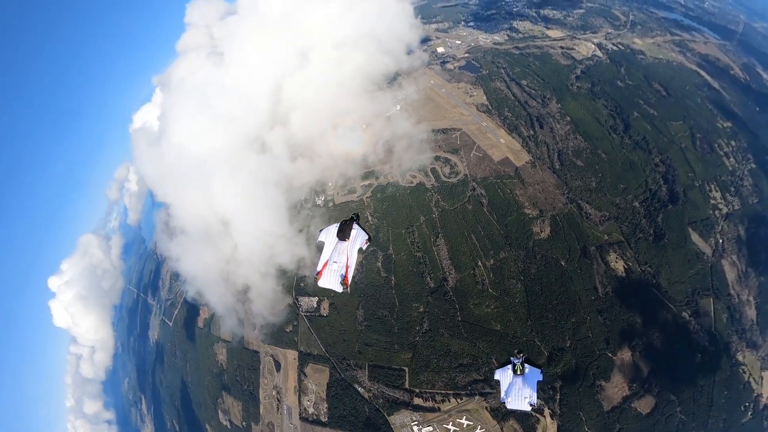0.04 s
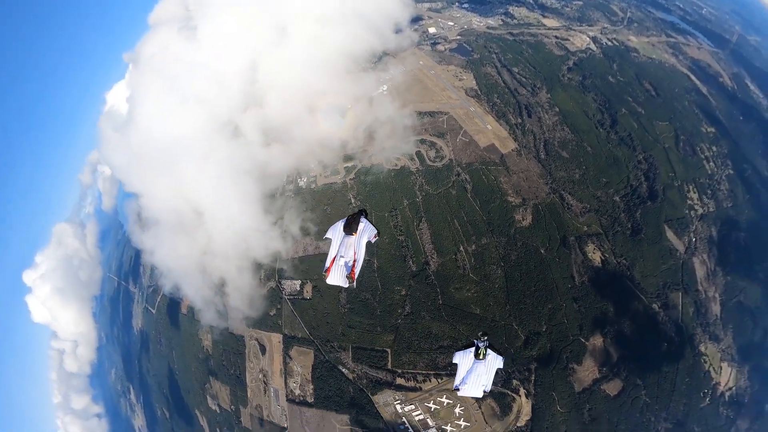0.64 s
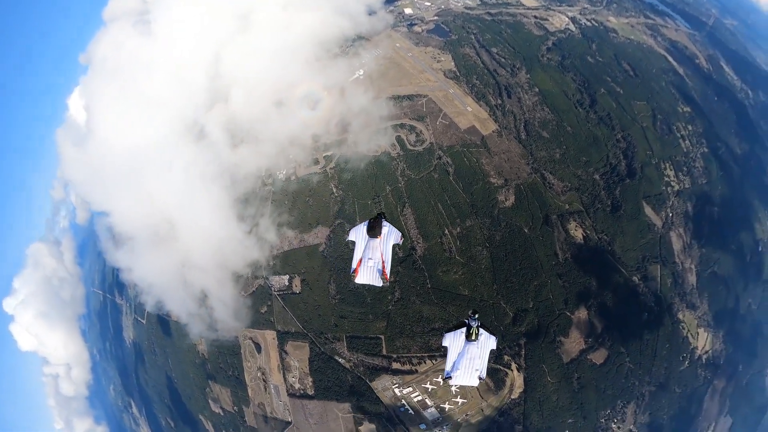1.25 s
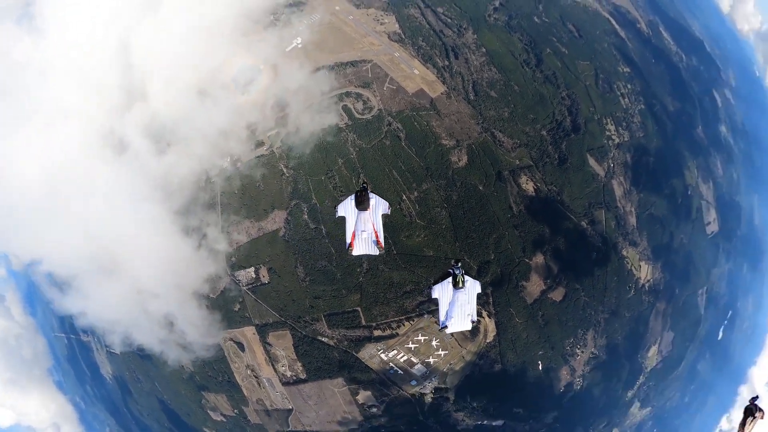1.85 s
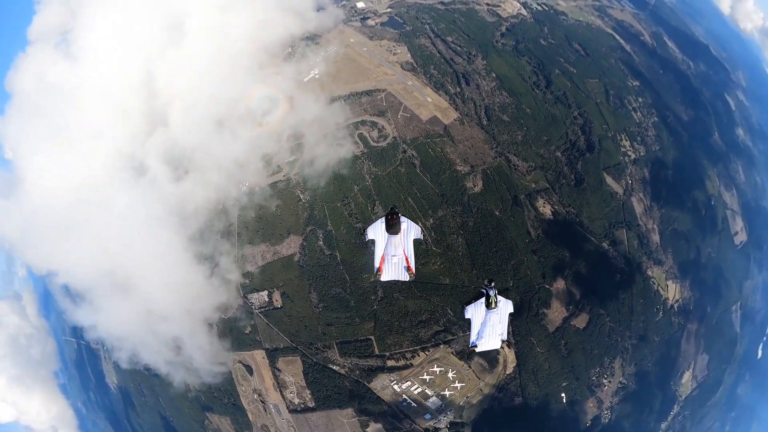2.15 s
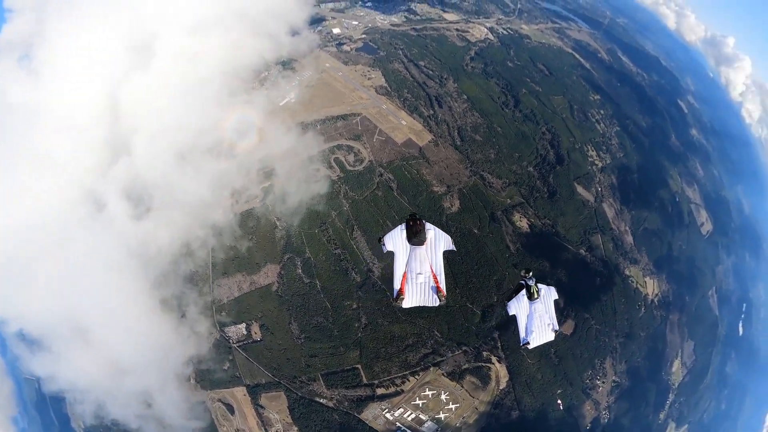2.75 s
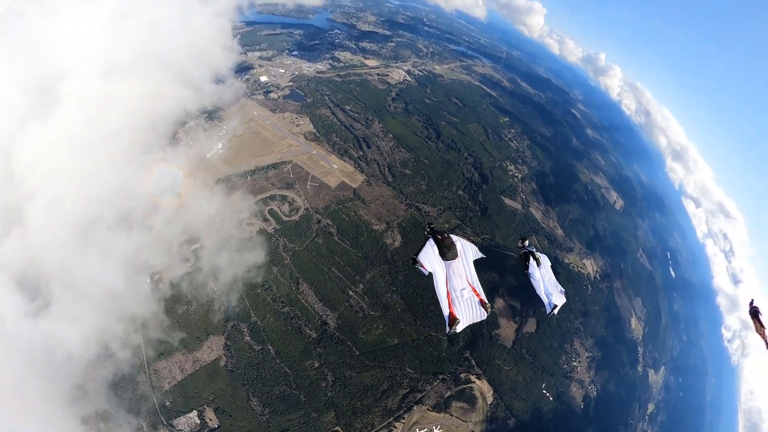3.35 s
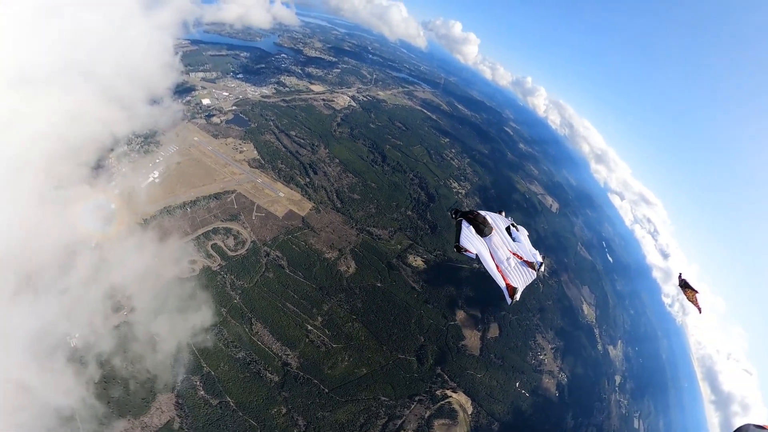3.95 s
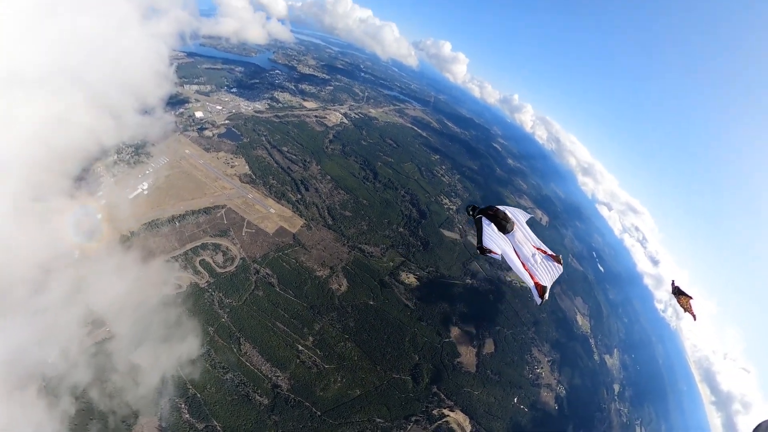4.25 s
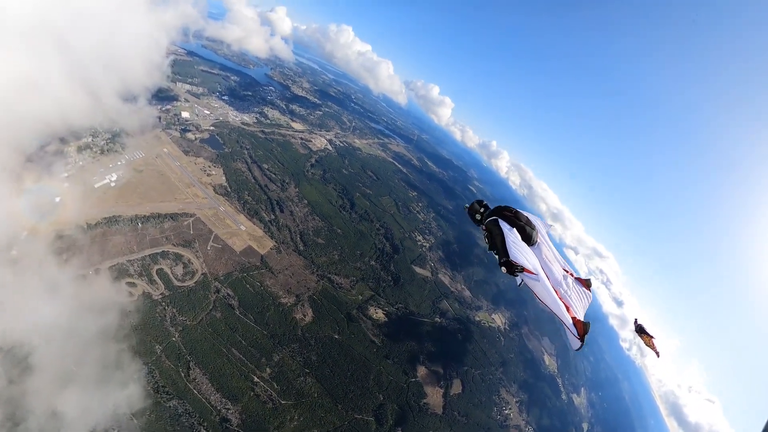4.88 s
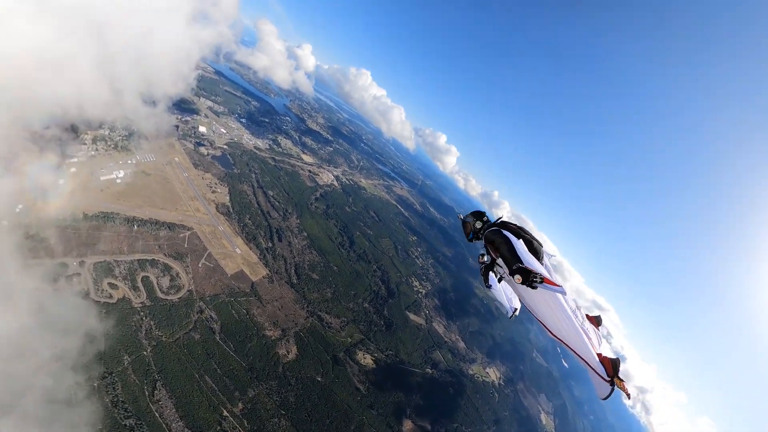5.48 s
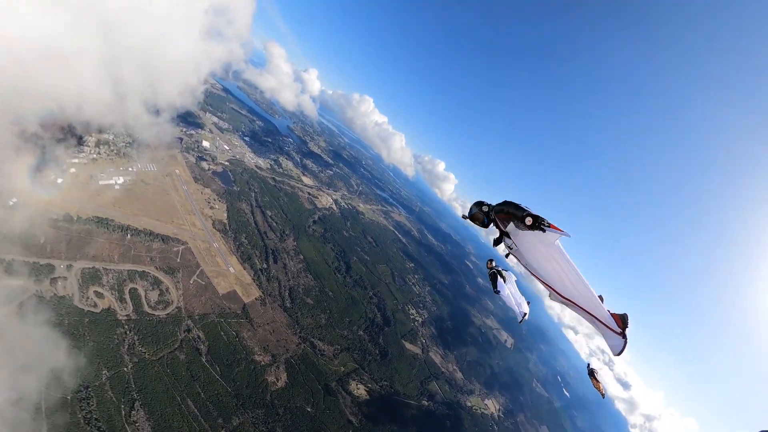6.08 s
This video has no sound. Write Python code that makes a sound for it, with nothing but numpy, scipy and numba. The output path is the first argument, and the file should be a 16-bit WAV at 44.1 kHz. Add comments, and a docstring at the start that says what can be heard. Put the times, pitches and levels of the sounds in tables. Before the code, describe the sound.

Wind rushes past a helmet microphone in wingsuit flight for about six seconds, a broad hiss over a low, fluttering roar. For the first 1.6 seconds it is fairly even, with thin, faint whistles and a very high ringing hiss. A strap buzzes faintly from about 1 to 2.4 seconds, and a deep drone swells underneath. A low gust thumps the microphone at 1.7 seconds, then the rush dips just after 2 seconds. From about 2.9 seconds the wind builds into heavier buffeting with a slight hollow howl, strongest from 3.5 to 5.4 seconds, while the high ringing fades in and out. Dull thuds land near 4.5 and 5.3 seconds. Short, ragged spurts of hiss tear through between 4.4 and 5.5 seconds. The air eases slightly, then surges again around 6 seconds.

```python
"""A rush of air over a low roar, with a thin whistle: wingsuit flight heard from a helmet camera.
Turbulence excites the resonances of the helmet's hollows and gaps, and a taut strap edge buzzes.
As the head turns, eddies strike the microphone in low surges and the flow tears into a ragged hiss.
The tiny microphone port rings high up while the flow grazes it smoothly."""
import sys
import numpy as np
from scipy import signal
from scipy.fft import rfft, irfft, next_fast_len
from scipy.io import wavfile
from scipy.ndimage import uniform_filter1d, minimum_filter1d
from numba import njit

SR = 44100
rng = np.random.default_rng(int(sys.argv[2]) if len(sys.argv) > 2 else 0)


def persist_wave(psi):
    """Save psi, clipped to +-1, as 16-bit WAV."""
    counts = np.round(np.clip(psi, -1, 1) * 32767).astype(np.int16)
    wavfile.write(sys.argv[1], SR, np.atleast_2d(counts).T)


N = 274302

# airflow strength against cruising: time_s, level_db
AIRFLOW_CURVE = [(0, .5), (.18, -1.5), (.45, 0.1), (.98, 0.6), (1.3, -2.5), (1.62, -1.5), (2.1, -6.5),
                 (2.8, -0.5), (3.68, 1.4), (3.81, 3.8), (3.91, 0), (4.55, 2), (4.92, -1.1), (5.35, 0),
                 (5.55, -4), (5.85, -2.5), (6.22, .5)]
# smoothness of the flow across the port: time_s, level_db
GRAZING_CURVE = [(0, 1), (1.62, 1), (1.9, -10), (2.1, -6), (2.55, -6), (2.95, -1), (3.47, -1), (3.97, -11),
                 (4.25, -6), (4.78, -23), (5.27, -1), (5.72, -16), (6.15, -5)]
# upper edge of the churning, higher for smaller whirls: time_s, cutoff_hz
CHURN_CUTOFF = [(0, 815), (1.5, 510), (2.7, 624), (3.6, 606), (3.8, 805), (5.2, 945), (5.7, 563),
                (6.22, 605)]

# spectra of turbulent pressure: frequency_hz, relative_db
EDDY_SPECTRUM = [(30, 4), (70, -18), (100, -2), (135, -0.5), (200, -2), (300, -5), (500, -8.5), (2000, -13)]
CHURN_SPECTRUM = [(120, -29), (260, 3.5), (400, 0.5), (560, -4), (800, -3.5), (1200, -8.5), (2000, -5.5),
                  (5000, -30)]
RUSH_SPECTRUM = [(300, 1), (700, -5), (1100, 4.5), (1450, 0), (1850, -1.5), (2300, -4), (2800, -5.5),
                 (3600, -8.5), (4800, -15), (6500, -24.5), (9000, -39), (16000, -60)]
HISS_SPECTRUM = [(2000, -14), (3500, -1), (5000, 0), (6500, -4), (8000, -10), (9000, -13), (10200, -10),
                 (11500, -9), (12300, -14), (13200, -27), (16000, -55)]
THUD_SPECTRUM = [(10, -12), (22, -5), (35, -3), (52, 0), (68, -1), (90, -8), (130, -20), (220, -45)]
RIP_SPECTRUM = [(600, -2), (1500, 5), (2800, 4), (4400, 1), (6000, -4), (7500, -10), (9000, -16),
                (10200, -12), (11600, -10), (12500, -18), (13500, -29), (16000, -60)]
# spectra of the port's ring and its parts: frequency_hz, relative_db
RING_SPECTRUM = [(9000, -32), (10800, -17), (11350, -12), (11700, -3), (12000, 0), (12400, -4),
                 (12800, -12), (13500, -30), (16000, -60)]
SIZZLE_SPECTRUM = [(10000, -40), (11500, -14), (12400, 0), (12800, 0), (13300, -3), (14200, -8),
                   (15600, -14)]
CORE_SPECTRUM = [(10500, -45), (11400, -22), (11750, -3), (12350, 0), (12800, -7), (13400, -25),
                 (16000, -60)]
SIDE_ON_SPECTRUM = [(8500, -22), (10000, -6), (11300, 0), (12300, -4), (13200, -22), (16000, -60)]
# resonances of the helmet's hollows: pitch_hz, width_hz, relative_db
HOLLOW_MODES = [(928, 100, -9.5), (1870, 260, -10.5), (2690, 620, -12)]
# overtones of the strap: harmonic_number, relative_db
STRAP_HARMONICS = [(2, -1), (3, -7), (4, 0), (5, -11), (6, -4.5), (7, -11), (8, -9)]

# whistling gaps: start_s, length_s, level_db, pitch_hz, glide_hz_per_s
GAP_WHISTLES = [(0, 1.0, -47, 935, -2), (.5, .45, -51.5, 2980, -450), (.88, 0.79, -52.5, 1865, -40),
                (.8, 0.49, -64, 6250, -480), (3, 0.27, -69, 6200, 650)]
# passing events in the flow: start_s, length_s, level_db
EDDY_THUMPS = [(.2, 0.12, -25), (.9, 0.6, -25), (1.73, 0.28, -20.5), (3.62, 0.13, -27), (4.52, 0.14, -19.5),
               (4.8, .38, -29), (5.28, 0.21, -17.5), (6.02, 0.15, -26)]
STRAP_BUZZES = [(.94, 0.7, -50.5), (1.85, .55, -57)]
WAKE_DRONES = [(.95, 0.34, -23.5), (1.5, 0.59, -24), (3.1, 0.32, -25), (3.8, 0.42, -23.5),
               (4.56, 0.1, -19.5), (5.15, .15, -20.5), (5.95, 0.22, -24)]
EDDY_SURGES = [(1.71, 0.29, -20), (2.88, 0.61, -20.3), (3.52, 1.0, -16.5), (4.66, 0.75, -17),
               (4.95, 0.17, -20.5), (5.48, 0.27, -21), (5.89, 0.29, -18.5)]
WHIRL_PACKS = [(3.2, 0.55, -27), (4.28, 0.31, -29), (5.0, .22, -35), (6.06, .16, -28.5)]
FLOW_TEARS = [(4.40, .035, -51), (4.61, 0.17, -48.5), (4.84, .03, -52), (4.94, 0.047, -50.5),
              (5.145, 0.057, -42), (5.24, 0.03, -43.5), (5.40, .012, -45.5), (5.435, 0.029, -50.5)]

TURN_START_S, TURN_LENGTH_S = 3.08, 1.16
TIME_S = np.arange(N) / SR


def undb(db):
    """Decibels to amplitude ratio."""
    return 10 ** (np.asarray(db) / 20)


def curve(table):
    """Linear interpolation of a table in time."""
    return np.interp(TIME_S, *np.transpose(table))


def unit(x):
    """Normalisation to rms 1."""
    return x / np.std(x)


def noise(spectrum):
    """Spectral shaping of white noise, rolling off beyond the table's ends; rms 1."""
    hz, db = np.transpose(spectrum)
    size = next_fast_len(N)
    f = np.maximum(np.arange(size // 2 + 1) * SR / size, 1)
    ends = np.minimum(f / hz[0], 1) * np.minimum(hz[-1] / f, 1) ** 2
    gain = undb(np.interp(np.log(f), np.log(hz), db)) * ends
    white = rfft(rng.standard_normal(size))
    return unit(irfft(white * gain, size)[:N])


def walk(rate_hz):
    """Random modulation: steps at rate_hz, smoothed twice; spread 1."""
    k = max(int(SR / rate_hz), 2)
    steps = np.repeat(rng.standard_normal(N // k + 1), k)
    return unit(uniform_filter1d(uniform_filter1d(steps, k), k)[:N])


def sustained(x, span_s):
    """Stationary flow: power holds steady over span_s while the quick flutter stays."""
    return x / np.sqrt(uniform_filter1d(x ** 2, max(int(span_s * SR), 2)) + 1e-12)


def swells(events, attack_s, release_s):
    """Incoherent addition: gain of events that rise, hold and decay, summed in power."""
    power = 0
    for start, length, db in events:
        rise = np.maximum(start - TIME_S, 0) / attack_s
        decay = np.maximum(TIME_S - start - length, 0) / release_s
        power = power + undb(db) ** 2 * np.exp(-2 * (rise + decay))
    return np.sqrt(power)


def turn(lag_s=0):
    """Incidence of the stream on the head, felt lag_s later: 0 facing down, 1 side-on."""
    return np.clip((TIME_S - lag_s - TURN_START_S) / TURN_LENGTH_S, 0, 1)


@njit
def svf(x, hz, damping):
    """A damped oscillator with moving tuning (state-variable filter); returns low-pass, band-pass."""
    low, band = np.empty(len(x)), np.empty(len(x))
    band_state, low_state = 0., 0.
    for i in range(len(x)):
        g = np.tan(np.pi * hz[i] / SR)
        v = (band_state + g * (x[i] - low_state)) / (1 + g * (g + damping))
        low[i], band[i] = low_state + g * v, damping * v
        band_state, low_state = 2 * v - band_state, 2 * low[i] - low_state
    return low, band


def resonance(hz, width_hz):
    """Forced resonance: turbulence drives a mode whose pitch drifts slightly; rms 1."""
    centre_hz = hz * (1 + 0.012 * walk(6.03))
    damping = float(width_hz / np.mean(hz))
    ring = svf(rng.standard_normal(N), centre_hz, damping)[1]
    return unit(svf(ring, centre_hz, 4 * damping)[1])


def wake_drone(flow_db, surge_db):
    """Vortex shedding: the wake behind the helmet drones, growing with the turbulence."""
    drones = swells(WAKE_DRONES, attack_s=0.032, release_s=0.077)
    gain = np.hypot(undb(-26 + 0.21 * surge_db + 0.33 * flow_db), drones)
    return sustained(resonance(80.7, width_hz=32.6), span_s=0.15) * gain


def eddy_buffet(gain):
    """Convected eddies: their roar falls off above the rate at which they pass, faster side-on."""
    rise_octaves = 0.59 * turn(lag_s=0.5) ** 2
    passing_hz = 178.5 * 2 ** rise_octaves
    roar = svf(noise(EDDY_SPECTRUM), passing_hz, damping=0.67)[0]
    return sustained(roar, span_s=0.082) * gain


def churning(flow_db, surge_db, whirls):
    """Eddy size sets frequency: smaller whirls churn above the roar."""
    gain = np.hypot(undb(-31 + 0.41 * surge_db + 0.88 * flow_db), whirls)
    churn = svf(noise(CHURN_SPECTRUM), curve(CHURN_CUTOFF), damping=0.97)[0]
    return sustained(churn, span_s=0.1) * gain


def helmet_rush(pressure, flow_db, torn):
    """Broadband excitation: rushing air pulses with each eddy and rings the hollows; tears flare it."""
    gain = np.hypot(undb(-38.5 + flow_db), torn * undb(7))
    rush = noise(RUSH_SPECTRUM) * undb(1 + 1.6 * pressure + 0.5 * walk(60))
    hollows = sum(resonance(hz, width) * undb(db + 2.1 * walk(3.8)) for hz, width, db in HOLLOW_MODES)
    return (rush + hollows * undb(0.8 - 3.1 * turn())) * gain


def cavity_hoot(flow_db):
    """Cavity resonance: the air in the helmet's big hollow hoots steadily."""
    return resonance(539, width_hz=113) * undb(-35.5 + 0.29 * flow_db + 1.03 * walk(3.7))


def port_hiss(pressure, flow_db, graze_db):
    """Fine-scale turbulence hisses at the microphone port, which is sheltered side-on."""
    level_db = -52 + 0.66 * flow_db + 0.26 * graze_db - 4.2 * turn()
    return noise(HISS_SPECTRUM) * undb(level_db + 0.42 * pressure + 0.42 * walk(110))


def port_ring(pressure, graze_db):
    """Grazing flow excites the port's resonance, broader and lower side-on."""
    side_on = turn()
    ring = noise(RING_SPECTRUM) * undb(-57.5 + graze_db - 3.6 * side_on)
    sizzle = noise(SIZZLE_SPECTRUM) * undb(-56 + 0.93 * graze_db - 13 * side_on)
    core = noise(CORE_SPECTRUM) * undb(-55 + 1.16 * graze_db - 2.5 * side_on)
    broad = noise(SIDE_ON_SPECTRUM) * side_on ** 2 * undb(-63.5 + 0.44 * graze_db)
    flutter_db = 1.2 * pressure * walk(160) + walk(50)  # strong eddies interrupt the grazing flow
    return (ring + sizzle + core + broad) * undb(flutter_db)


def gap_whistles():
    """Narrow resonances: gaps in the helmet whistle thinly, gliding in pitch."""
    out = 0
    for start, length, db, pitch_hz, glide in GAP_WHISTLES:
        hz = pitch_hz + glide * np.clip(TIME_S - start, 0, length)
        whistle = resonance(hz, width_hz=0.033 * pitch_hz)
        out = out + whistle * swells([(start, length, db)], attack_s=0.11, release_s=0.11)
    return out


def eddy_thuds(surge_db):
    """Large-scale turbulence: the biggest eddies give the slowest pressure swings, heard as thuds."""
    thumps = swells(EDDY_THUMPS, attack_s=0.031, release_s=0.04)
    gain = np.hypot(undb(-33 + 0.55 * surge_db), thumps)
    return sustained(noise(THUD_SPECTRUM), span_s=0.145) * gain


def strap_buzz():
    """Aeroelastic flutter: a taut strap edge buzzes like a reed, its pitch shaken by turbulence."""
    pitch_hz = 479 - 13.5 * TIME_S  # sags as the strap slackens
    phase = 2 * np.pi * np.cumsum(pitch_hz * (1 + 0.007 * walk(110))) / SR
    buzz = np.sqrt(2) * sum(undb(db) * np.sin(k * phase) for k, db in STRAP_HARMONICS)
    return buzz * swells(STRAP_BUZZES, attack_s=0.35, release_s=0.12) * undb(2 * walk(44.6))


def whirl_howl(whirls):
    """A broad resonance: packs of whirls sweeping round the helmet howl hollowly, less so side-on."""
    return resonance(463, width_hz=176) * whirls * undb(-1.5 - 3.1 * turn(lag_s=0.45))


def tearing_flow(pressure, torn):
    """Flow separation: air tears off the housing in ragged spurts of hiss."""
    return noise(RIP_SPECTRUM) * torn * undb(5 + 1.7 * pressure + 1.3 * walk(320))


def scene():
    """Superposition and amplitude modulation: the low roar's pressure pulses the rush and the hiss."""
    flow_db, graze_db = curve(AIRFLOW_CURVE), curve(GRAZING_CURVE)
    whirls = swells(WHIRL_PACKS, attack_s=0.11, release_s=0.11)
    torn = swells(FLOW_TEARS, attack_s=0.026, release_s=0.038)
    calm_gain = undb(-28)
    buffet_gain = np.hypot(calm_gain, swells(EDDY_SURGES, attack_s=0.038, release_s=0.1))
    surge_db = 20 * np.log10(buffet_gain / calm_gain)

    roar = wake_drone(flow_db, surge_db) + eddy_thuds(surge_db) + eddy_buffet(buffet_gain)
    roar += churning(flow_db, surge_db, whirls) + whirl_howl(whirls)
    pressure = 1.2 * np.tanh(roar / undb(-16))
    helmet = helmet_rush(pressure, flow_db, torn) + cavity_hoot(flow_db)
    edges = strap_buzz() + gap_whistles()
    port = port_hiss(pressure, flow_db, graze_db) + port_ring(pressure, graze_db)
    return (roar + helmet + edges + port + tearing_flow(pressure, torn))[None]


def record(dry):
    """Peak limiting holds down the biggest pressure swings; a steep low-pass cuts the top."""
    ceiling_db, top_hz = -5, 15600
    hold = int(0.012 * SR)
    gain = np.minimum(undb(ceiling_db) / (np.abs(dry) + 1e-9), 1)
    gain = uniform_filter1d(minimum_filter1d(gain, hold), hold)
    low_pass = signal.ellip(12, 0.1, 80, top_hz, fs=SR, output="sos")
    return signal.sosfilt(low_pass, dry * gain)


dry = scene()
out = record(dry)
persist_wave(out)
```